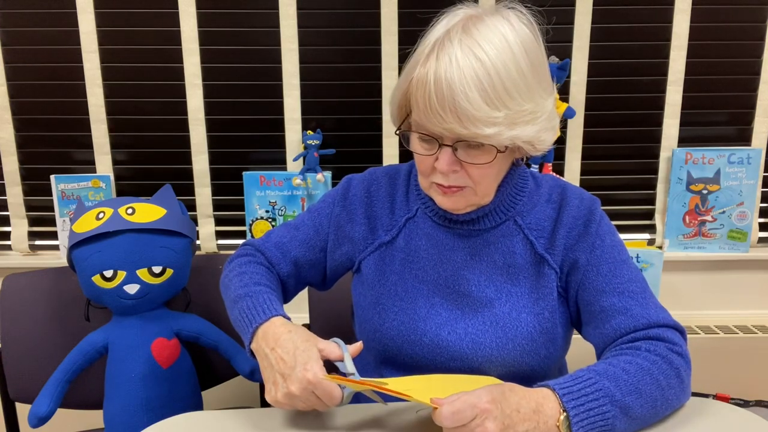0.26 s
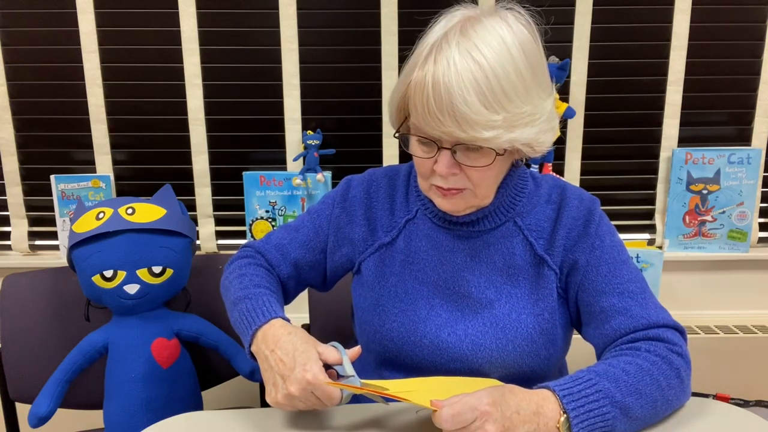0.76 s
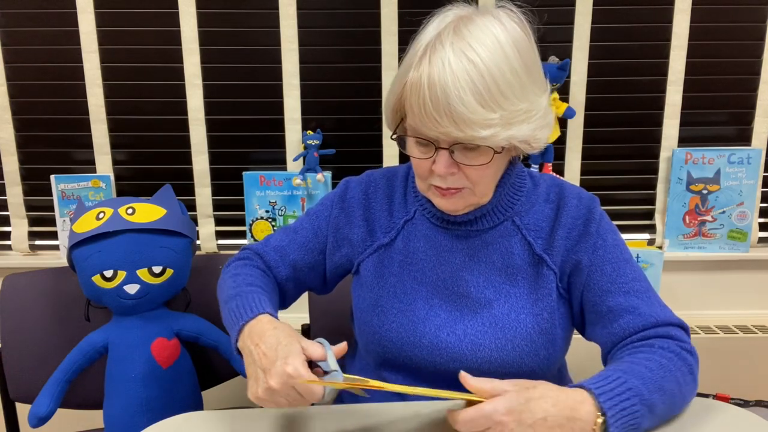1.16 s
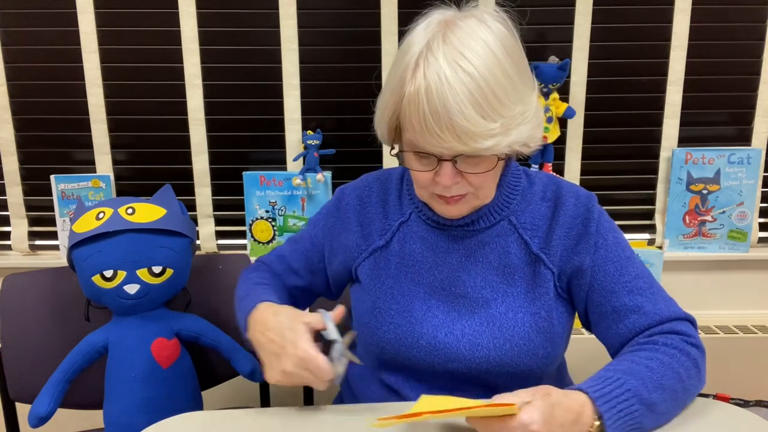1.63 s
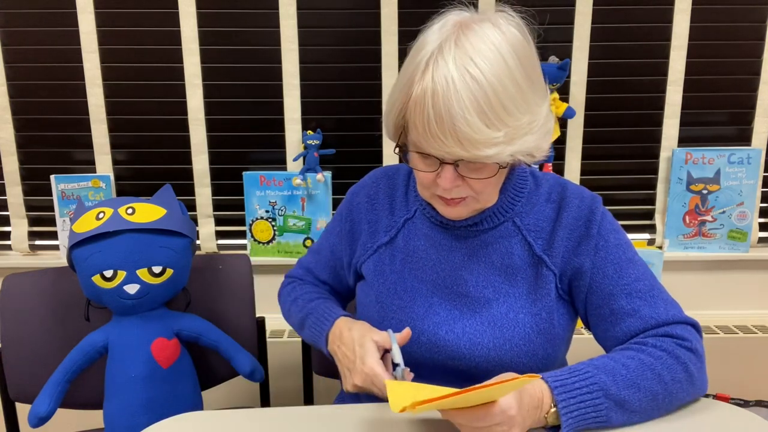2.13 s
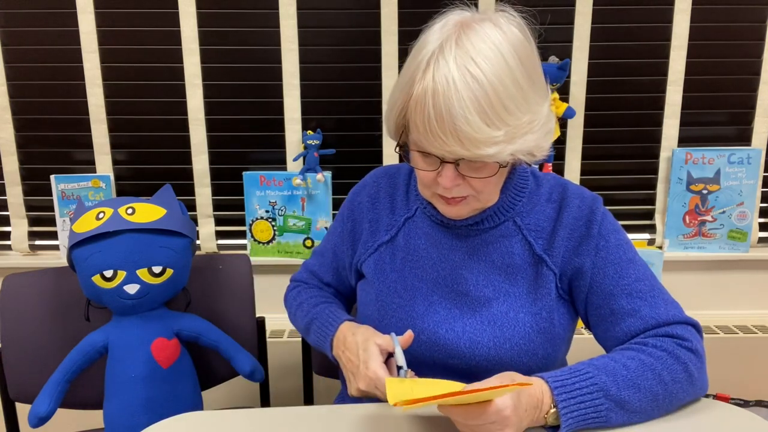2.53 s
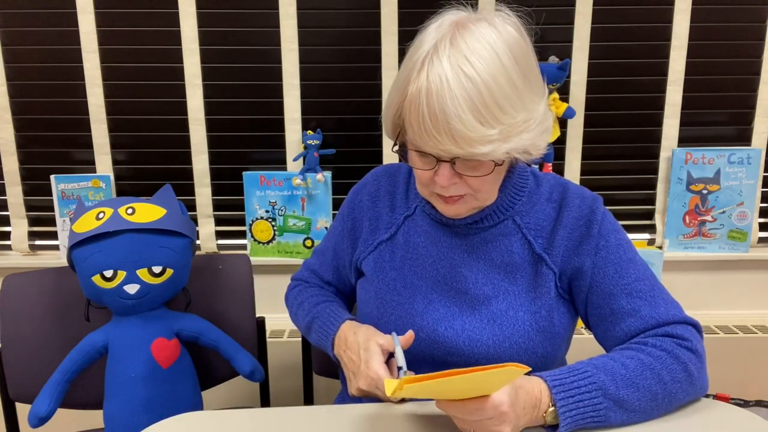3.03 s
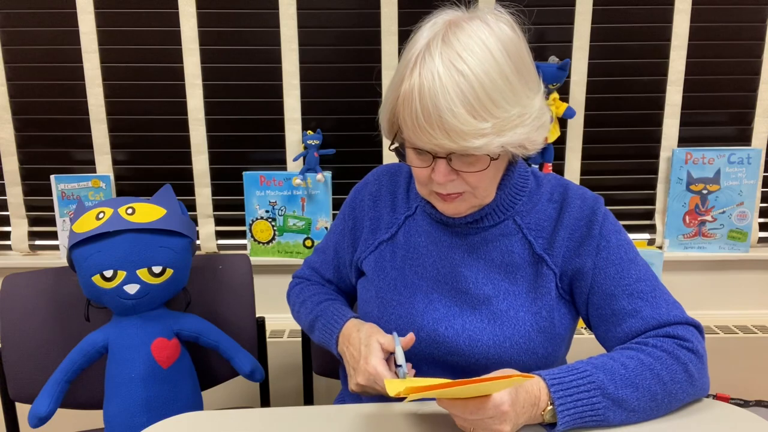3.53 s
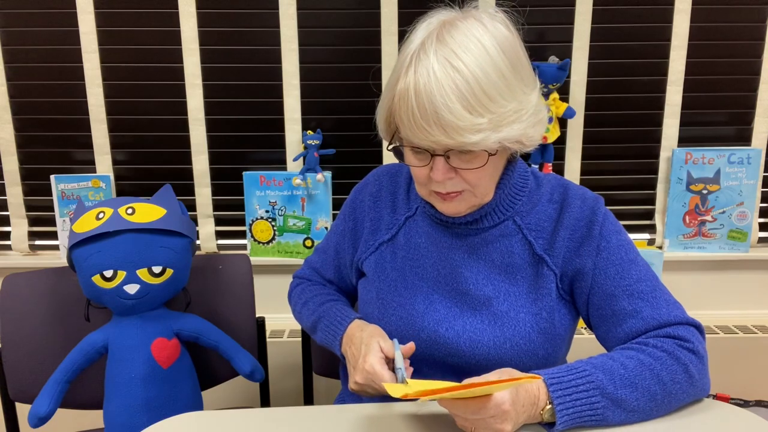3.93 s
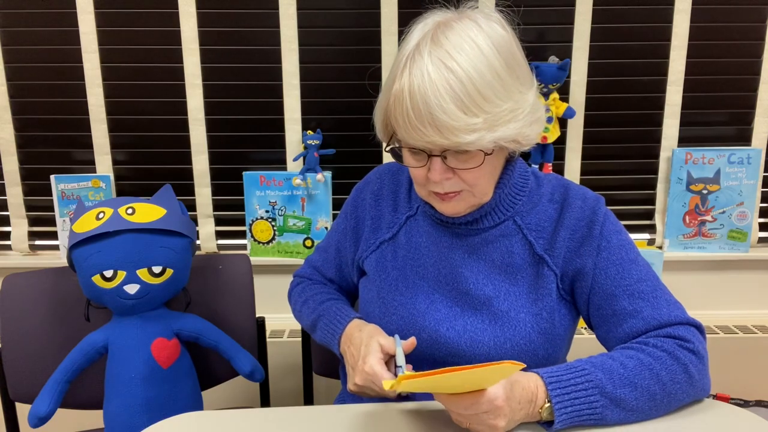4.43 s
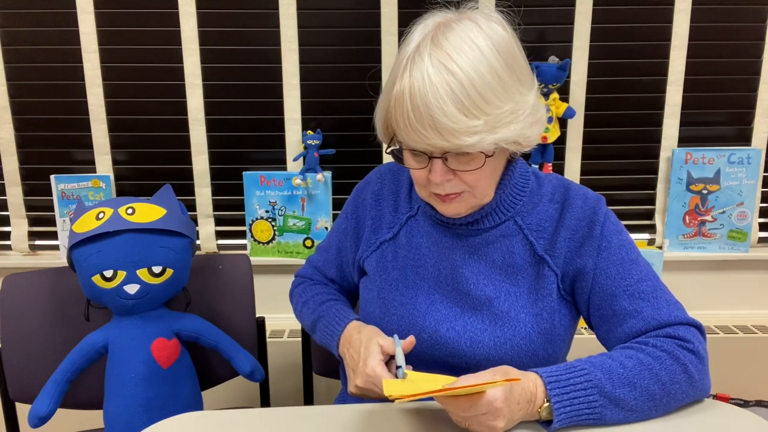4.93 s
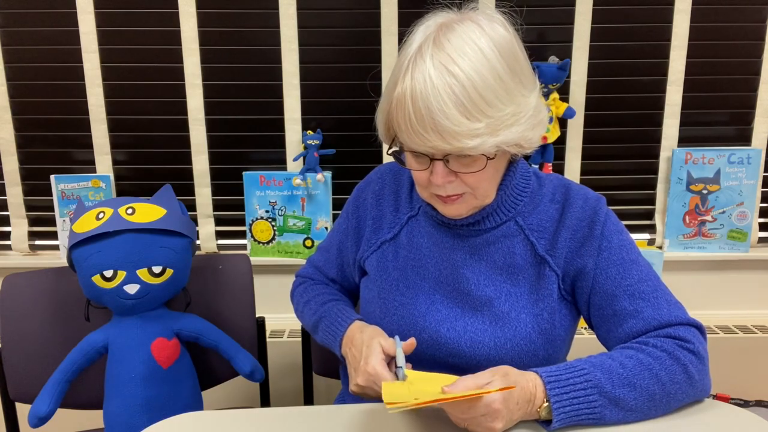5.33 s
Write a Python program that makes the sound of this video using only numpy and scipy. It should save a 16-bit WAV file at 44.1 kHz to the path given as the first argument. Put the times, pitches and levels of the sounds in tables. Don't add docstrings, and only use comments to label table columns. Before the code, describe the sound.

Close, dry sounds of scissors and stiff card above a table, picked up by a stereo phone at about a metre. One hard snip, soft rustles and rasping cuts, small creaks, then crisp clicks around four seconds and the strongest tearing snaps near the end. Steady low air noise continues throughout.

```python
import sys
import numpy as np
from scipy import signal
from scipy.fft import rfft, irfft
from scipy.io import wavfile
from scipy.ndimage import uniform_filter1d

SR = 44100
rng = np.random.default_rng(int(sys.argv[2]) if len(sys.argv) > 2 else 0)


def pcm_store(signal):
    levels = np.round(np.clip(np.atleast_2d(signal), -1, 1) * 32767)
    wavfile.write(sys.argv[1], SR, levels.astype(np.int16).T)


def voltage_ratio(level):
    return 10 ** (np.asarray(level, float) / 20)


N = 246519
TIME_S = np.arange(N) / SR
HZ = np.fft.rfftfreq(N, 1 / SR)
STEPS_S = np.arange(0, N / SR + .001, .0005)
TOP_HZ = 16740

# frequency [Hz], density [dB per Hz].
AIR_SPECTRUM = [(30, -14), (50, -19.5), (65, -6), (95, -1), (120, -1), (180, -5.5), (270, -12.5),
                (600, -24), (1100, -30), (2000, -42.5), (3500, -54.5), (6500, -57.5), (10000, -57.5),
                (14500, -74), (16500, -84)]
AIR_DB = -49
# frequency [Hz], side minus mid [dB].
AIR_SIDE = [(40, -18.5), (100, -16), (250, -11.5), (600, 2), (1500, -4.5), (4000, 1.5)]
# frequency [Hz], width [Hz], level [dB].
DUCTS = [(66.03, 8.3, -55), (121, 25, -56), (172.4, 12.6, -66), (550, 68, -70.5), (446, 40, -75),
         (636.7, 64, -73.5), (1000, 90, -78.5)]
# share of the gusts it follows, and its own wander in dB.
DUCT_FOLLOW = [1.26, .5, 0.43, 0.24, .2, .2, 0.17]
DUCT_WANDER_DB = [0, 0.64, 3.5, 1.44, 1.1, 2.1, 1.3]
# time [s], level [dB].
GUSTS = [(0.0, -56.5), (0.03, -46), (0.09, -54.5), (1.01, -51), (1.09, -57), (1.17, -47), (1.42, -58),
         (1.79, -52), (3.27, -54.5), (3.38, -48), (3.64, -50.5), (3.71, -58.5), (3.98, -52.5),
         (4.06, -65.5), (4.09, -54.5), (4.78, -57), (5.42, -47.5), (5.59, -56)]

ROOM_T60_S, ROOM_DB, WALL_MS = 0.23, -9.5, 8.5
TABLE_MS, TABLE_GAIN, LOWERED_S = 1.33, -.45, 1.9

# frequency [Hz], density [dB per Hz].
FIBRE_SPECTRUM = [(400, 1), (800, -3), (1300, -8), (2000, 6.5), (3000, 1.5), (4000, -9.5), (5200, -4),
                  (6500, -1.5), (8000, -8), (10000, -10.5), (11500, -12.5), (13000, -18), (14800, -26),
                  (16300, -33)]
# start [s], length [s], level [dB], swell over the move [dB], fibre hiss [dB].
SLIDES = [(0.977, 0.025, -85.5, 6, 4.5), (1.093, 0.071, -64.5, 1, 1.5), (1.168, .132, -65, -3, 3.5),
          (1.506, 0.067, -73.5, -10.5, 0)]
# start [s], length [s], level [dB], swell [dB], hiss [dB].
RUSTLES = [(0.019, .1, -65.5, -3, -5.5), (1.022, .07, -76, 0, -4.5), (1.565, .06, -81, 0, -6),
           (1.61, .09, -77, 2, -6.5), (1.7, .095, -72, 0, -6), (1.795, 0.019, -67, 0, -13),
           (1.82, .06, -71.5, -6.5, -6.5)]
# start [s], length [s], level [dB], swell [dB], hiss [dB].
CUTS = [(1.349, .012, -68, -3, -4), (1.375, 0.036, -63, -5.5, -1), (1.42, 0.045, -65, 1, 3.5),
        (2.003, .012, -77.5, 1, -5.5), (2.017, .034, -72, 0, -10), (2.052, .026, -71, 0, -6),
        (2.079, .012, -66.5, -1, -7), (2.09, 0.026, -69, -1.5, -5.5), (2.12, 0.054, -73.5, -1, -12),
        (2.179, .02, -66.5, -0.5, -18), (2.2, 0.03, -72.5, -4, -13.5), (2.23, .028, -77, 0, -9),
        (2.258, 0.085, -72.5, -3, -11), (4.409, 0.047, -68, -0.5, -12)]
# start [s], length [s], level [dB], swell [dB], hiss [dB].
STROKES = [(4.264, 0.086, -62, 4.5, -4), (4.343, .064, -56.5, -11, -5.5), (4.895, 0.052, -88, 2, -1),
           (4.946, .11, -75, 1, -8)]
# start [s], length [s], level [dB], swell [dB], hiss [dB].
TEARS = [(5.413, 0.014, -60, -4, -9), (5.469, 0.0076, -47.5, -1.5, -9.5), (5.574, 0.015, -59, 13.5, -9)]
# start [s], length [s], level [dB], swell [dB], hiss [dB].
CREASES = [(2.462, 0.012, -71.5, -2.5, -13), (2.525, .008, -74.5, -2, -11), (2.619, 0.02, -69, -5.5, -4),
           (2.784, 0.058, -79.5, -4, -16), (3.29, 0.11, -87, 8, -12), (3.442, 0.026, -75.5, 1, -9),
           (3.516, 0.012, -69, -2, -6), (3.536, .045, -78, 0, -7), (3.583, .012, -68, -2, -6),
           (3.596, 0.024, -73, -3, -7), (3.637, .017, -59.5, -1.5, -4), (3.65, .04, -65, -22, -8),
           (4.239, .016, -73, -5, -5), (5.238, 0.0088, -72, -4, -7), (5.309, 0.081, -62, -15, -6),
           (5.445, 0.007, -65, -1, -15), (5.462, .034, -61, -5, -9), (5.497, 0.054, -67, -4, -7),
           (5.557, 0.014, -61, -0.5, -17), (3.805, .01, -80.5, -2.5, -16), (3.92, 0.016, -79.5, 10, -10)]
# low rasp [dB], blade scrape [dB], attack [dB per ms],
# release [dB per ms], paper edge [dB].
KINDS = [
    (-2, -4.5, 4, 0.6, -2.5),
    (2, -10.5, 1.1, 0.5, 1.5),
    (4, -4, 0.8, 1.5, 1.5),
    (-2.5, -3.5, 2.5, 2, -6),
    (-4, -10, 2, 1.7, -0.5),
    (3.5, -9.5, 3, 2.5, -6),
]
# layer, weight of its level, four band edges in Hz, trim in dB.
FIBRE_BANDS = [
    ("rasp", 1, [300, 590, 1220, 1810], 0.5),
    ("body", 1, [1300, 1430, 3130, 3600], -1.1),
    ("scrape", 1, [3100, 3750, 4350, 4800], 0.2),
    ("scrape", 1.5, [3740, 3900, 3920, 4040], -9),
    ("edge", 1, [4200, 4740, 6100, 7000], -1),
    ("hiss", 1.08, [6340, 7400, 11700, 12300], 1.5),
    ("hiss", 1.7, [11180, 12600, 15000, 16000], -5)]

# start [s], length [s], level [dB], from [Hz], to [Hz].
HUMS = [(.728, 0.02, -74, 2000, 2000), (1.375, 0.026, -60, 3900, 3600), (1.39, 0.031, -66, 2900, 2900),
        (1.42, 0.025, -60, 904, 1300), (1.428, 0.039, -67, 5100, 5300), (1.445, .025, -64, 2900, 2900),
        (1.453, .018, -59, 1610, 2120), (2.017, .035, -64, 3400, 3100), (2.053, .05, -64.5, 1102, 1300),
        (2.05, 0.06, -68.5, 2190, 2300), (2.179, 0.018, -65, 1156, 1100), (2.18, 0.044, -72, 2000, 2400),
        (2.26, .04, -76, 2100, 2100), (2.612, 0.028, -71, 1700, 2000), (4.074, .008, -62, 1900, 1900),
        (4.263, .022, -62.5, 3900, 3900), (4.29, 0.083, -68.5, 4700, 4650), (4.32, 0.067, -67, 1050, 1045),
        (5.305, 0.056, -68, 1500, 2120), (5.412, .008, -59, 1090, 1200), (5.464, .013, -50, 1042, 1030),
        (5.469, .008, -56, 5800, 6800), (5.559, 0.011, -62, 3300, 3310), (5.578, .013, -50, 2000, 2800),
        (1.42, .03, -64, 3900, 4100), (1.422, .026, -65, 2200, 2600), (1.436, .014, -64, 4800, 4800),
        (3.636, .016, -58, 2000, 950), (4.262, .1, -67, 2700, 2800), (1.25, .09, -72, 2300, 2600),
        (.73, .018, -70, 1500, 1500), (4.29, .06, -68, 4050, 3950), (4.3, .06, -65, 1900, 1850),
        (4.4, .06, -75, 3900, 3800), (1.21, .09, -69, 3800, 3700), (2.005, .04, -70, 4000, 3900),
        (2.18, .16, -80, 3700, 3900), (1.62, .2, -80, 3000, 3300), (2.003, .045, -77, 5300, 5200),
        (2.177, .04, -82, 5900, 5800), (5.412, .016, -62, 2500, 2700), (5.574, .016, -57, 2900, 3100)]
HUM_WIDTH_HZ, HUM_ATTACK, HUM_RELEASE = 300, 4.8, 2.6

# time [s], peak [dB],
# frequency [Hz], ring time [ms].
PINGS = [(0.192, -55, 900, 9.6), (1.0069, -46.5, 1060, 7.6), (1.0064, -47, 4800, 8), (1.327, -46, 600, 20),
         (1.32, -52, 1100, 10), (1.344, -46, 594, 12), (1.934, -54, 1000, 7), (2.464, -55, 1100, 8),
         (2.943, -66, 900, 7.2), (3.107, -58, 900, 8), (3.437, -54, 1000, 9.4), (3.9448, -36, 4050, 6),
         (3.9442, -45, 8900, 4), (3.9445, -43, 15000, 3), (4.068, -39, 4460, 4), (4.085, -50, 2400, 5),
         (4.068, -52, 3300, 5), (4.068, -40, 7460, 4.4), (4.1302, -35, 4170, 5.2),
         (4.1302, -38.5, 9800, 3.4), (4.1301, -40, 2690, 6.5), (4.131, -43.5, 1090, 5.2),
         (4.1302, -48, 7600, 4), (4.2385, -52, 1200, 8), (4.433, -40.5, 2200, 5.6), (4.433, -42, 604, 9.9),
         (4.432, -47, 7000, 4.3), (4.433, -47, 5740, 5.1), (4.449, -43, 2000, 5.5), (4.449, -39, 704, 9),
         (5.046, -54, 3380, 7.3), (5.3012, -37.5, 1110, 5.5), (5.3012, -40, 3900, 4.6),
         (5.3014, -48, 1550, 4.9), (5.3013, -42, 13500, 3), (5.3008, -40, 2520, 5.3),
         (5.46, -32, 1800, 5.8), (5.46, -36, 890, 8), (5.46, -39, 6940, 4.6), (5.4604, -44, 5760, 3.7),
         (5.465, -38, 550, 8), (5.471, -38, 4670, 6), (5.482, -44, 300, 23), (5.5, -42, 2260, 8.7),
         (5.5, -48, 900, 8), (5.561, -44, 980, 8), (5.561, -48, 2100, 10), (3.648, -52, 9000, 4),
         (3.6535, -54, 9000, 4),
         (0.588, -30.5, 2000, 8), (0.5883, -36, 2850, 5), (0.5886, -36, 1000, 6), (0.5893, -37, 660, 14),
           (0.5886, -39, 4530, 6), (0.5892, -44, 5310, 4), (0.5892, -42, 3560, 4), (0.596, -44, 650, 25),
           (0.7269, -45, 4550, 6), (0.7267, -45, 1990, 9), (0.7268, -46, 2700, 5), (0.7265, -54, 3500, 4),
           (1.0918, -54, 4310, 5), (1.265, -52, 4700, 8), (1.321, -56, 9000, 4), (1.345, -54, 10000, 4),
           (1.4305, -46, 1760, 7), (1.7948, -53, 1560, 10), (2.0173, -54, 3760, 7), (2.0307, -50, 3390, 8),
           (2.1795, -47, 1070, 10), (2.2597, -57, 1100, 9), (2.3281, -58, 1070, 9), (2.34, -60, 3000, 6),
           (3.5207, -58, 3400, 6), (3.64, -48, 2100, 7), (3.647, -46, 1050, 9), (4.2628, -49, 1790, 7),
           (4.2783, -46, 3870, 10), (4.308, -48, 2100, 7), (4.346, -47, 3200, 5), (4.352, -48, 1800, 8)]

# time [s], peak [dB], ringing [Hz].
CRACKLES = [(0.178, -60, 2000), (0.2274, -58, 1620), (1.0233, -63, 2530), (1.2654, -54, 3680),
            (1.3224, -64, 2070), (1.796, -60, 2330), (1.9334, -64, 1810), (2.0018, -52, 3600),
            (2.4613, -54, 1740), (2.6186, -46, 2030), (2.941, -68, 1800), (3.107, -69, 1800),
            (3.443, -59.5, 1700), (3.5156, -59, 2430), (3.583, -47, 2160), (4.239, -62, 1810),
            (5.238, -50, 1700), (5.445, -50, 1680), (5.4992, -57, 2300)]
CRACKLE_THUD_DB, CRACKLE_TICK_DB = 4, -14
# time [s], peak [dB], ringing [Hz], thud [dB], tick [dB].
SNAPS = [(0.03, -39, 1760, 0, -22), (0.5878, -21, 2900, -3, -13.5), (0.589, -27.5, 2800, -18, -16.5),
         (0.7262, -41, 2900, -22, -4.5), (1.0066, -56, 4570, 4, 2), (1.326, -56, 1800, 14, -25),
         (1.3523, -38, 3940, 3, -17), (1.375, -38, 3760, -8, -13), (2.1799, -56, 3200, -9, -31),
         (3.6844, -45, 1950, -13, -16), (3.9441, -28, 3900, -8, -17), (3.9448, -35, 2000, -13, -16),
         (4.0676, -28.5, 1920, -28, -8), (4.1298, -29, 4130, -20, -4), (4.4331, -41, 2100, -14, -17),
         (4.4488, -53, 1940, -12, -29), (5.0454, -49.5, 1670, 14, -5), (5.3002, -27.5, 3600, -4, -6.5),
         (5.3011, -29, 3700, 0.5, -15), (5.4136, -44, 2280, -4, -15), (5.4597, -21, 1850, -7, -16.5),
         (5.4652, -31, 1940, 8.5, -22), (5.4712, -33, 2790, -10, -6), (5.5605, -39, 1870, -17, -28)]
# frequency [Hz], density [dB per Hz].
SNAP_SPECTRUM = [(400, -26.5), (800, 9.5), (1300, -9.5), (2000, -7.5), (3000, -7), (4000, -11.5),
                 (5200, -8.5), (6500, -5), (8000, -12), (10000, -16.5), (11500, -16.5), (13000, -21),
                 (14800, -27), (16300, -38)]
FAINT_DB, FAINT_MS, SHORTER_MS_PER_DB = -60, 2.45, 0.02
AGAIN_MS, AGAIN_SHARE = 0.687, 0.27

# frequency [Hz], left leads by [radians].
PORT_PHASE = [(0, 0), (2000, .6), (3800, .8), (5000, 1.7), (6000, 2.4), (7200, 3.3), (8900, 5.95),
              (10400, 6.5), (11900, 9.15), (13200, 10), (14800, 12.3), (16800, 12.9)]
# frequency [Hz], left minus right [dB], diffuse difference kept [dB].
PORT_GAIN = [(98.4, -0.5, 6), (404, 0.5, 1), (2000, 1.7, 0.5), (4300, 2, -3.5), (7340, 3.5, -6.5),
             (9000, -0.5, -8), (10500, 0.5, -6), (12900, 1.5, -5.5), (16000, -2, -2)]


def curve(table, column=1):
    t = np.array(table)
    return np.interp(np.log(HZ + 1), np.log(t[:, 0] + 1), t[:, column])


def colour(x, table):
    cepstrum = irfft(curve(table) * np.log(10) / 20, N)
    cepstrum[1:N // 2] *= 2
    cepstrum[N // 2 + 1:] = 0
    return irfft(rfft(x) * np.exp(rfft(cepstrum)), N)


def band(x, lo_hz, hi_hz):
    return signal.sosfilt(signal.butter(2, [lo_hz, hi_hz], "bandpass", fs=SR, output="sos"), x)


def unit(x):
    return x / np.sqrt(np.mean(x ** 2))


def walk(rate):
    k = int(SR / rate)
    held = np.repeat(rng.standard_normal(N // k + 1), k)
    return 1.94 * uniform_filter1d(uniform_filter1d(held, k), k)[:N]


def ventilation():
    mid, side = colour(rng.standard_normal((2, N)), AIR_SPECTRUM)
    scale = voltage_ratio(AIR_DB - 2.5) / np.sqrt(np.mean(mid ** 2))
    mid, side = scale * mid, scale * colour(side, AIR_SIDE)
    s, db = np.transpose(GUSTS)
    gust = np.interp(TIME_S, s, db - db.mean())
    for (hz, width_hz, db), follow, wander_db in zip(DUCTS, DUCT_FOLLOW, DUCT_WANDER_DB):
        ring = unit(band(rng.standard_normal(N), hz - width_hz / 2, hz + width_hz / 2))
        mid = mid + ring * voltage_ratio(db + follow * gust + wander_db * walk(1.982))
    rumble_cut = signal.butter(2, 40, "highpass", fs=SR, output="sos")
    return signal.sosfilt(rumble_cut, [mid + side, mid - side])


def room(x):
    t = np.arange(int(.4 * SR)) / SR
    echoes = rng.standard_normal((2, len(t))) * voltage_ratio(4.0 * rng.standard_normal((2, len(t))))
    echoes *= np.clip((t * 1000 / WALL_MS) ** 4.0, .3, 1)
    echoes *= voltage_ratio(-60 * t / ROOM_T60_S) * (1 + 2.0 * np.exp(-t / 0.0091))
    echoes = signal.lfilter([.75], [1, -.25], echoes)
    echoes /= np.sqrt(np.sum(echoes ** 2) / 2)
    return voltage_ratio(ROOM_DB) * signal.fftconvolve(x[None], echoes, axes=1)[:, :N]


def table_bounce(card):
    lowered = TIME_S > LOWERED_S
    delay_ms = TABLE_MS + np.array([[.03], [-.03]])
    bounce = TABLE_GAIN * np.exp(-2j * np.pi * HZ * delay_ms / 1000) / (1 + HZ / 9000)
    return irfft(rfft(card * lowered) * bounce, N) * lowered


def move_db(start, length, db, swell_db, attack, release):
    t = STEPS_S - start
    hold = db + swell_db * np.clip(t / max(length, .002), 0, 1)
    return hold - 1000 * (attack * np.maximum(-t, 0) + release * np.maximum(t - length, 0))


def fibre_grains():
    return rng.standard_normal(N) * voltage_ratio(3.9 * np.minimum(rng.exponential(size=N), 5))


def rubs(grains):
    moves = []
    tables = [SLIDES, RUSTLES, CUTS, STROKES, TEARS, CREASES]
    for table, (rasp_db, scrape_db, attack, release, edge_db) in zip(tables, KINDS):
        for start, length, db, swell_db, hiss_db in table:
            level = voltage_ratio(move_db(start, length, db, swell_db, attack, release))
            share_db = dict(rasp=rasp_db, body=0, scrape=scrape_db, hiss=hiss_db, edge=1.4 * hiss_db + edge_db)
            moves.append((level, share_db))
    out, fibres = np.zeros(N), rfft(colour(grains, FIBRE_SPECTRUM))
    common = walk(45)
    for layer, weight, edges_hz, trim_db in FIBRE_BANDS:
        gain = np.max([level * voltage_ratio(weight * share_db[layer]) for level, share_db in moves], axis=0)
        gain = uniform_filter1d(np.interp(TIME_S, STEPS_S, gain), size=90)
        patch_db = .6 * common + 1.3 * walk(70)
        part = unit(irfft(fibres * np.interp(HZ, edges_hz, [0, 1, 1, 0]), N))
        out += part * gain * voltage_ratio(trim_db + patch_db)
    return out


def hums(grains):
    out = np.zeros(N)
    slow = unit(irfft(rfft(grains) / (1 + (HZ / HUM_WIDTH_HZ) ** 2), N))
    for k, (start, length, db, from_hz, to_hz) in enumerate(HUMS):
        near = slice(int((start - .02) * SR), int((start + length + .06) * SR))
        hz = np.interp(TIME_S[near], [start, start + length], [from_hz, to_hz])
        level = voltage_ratio(move_db(start, length, db, 0, HUM_ATTACK, HUM_RELEASE))
        gain = np.interp(TIME_S[near], STEPS_S, level)
        flutter = np.roll(slow, shift=7919 * k)[near]
        out[near] += np.sqrt(2) * gain * flutter * np.sin(2 * np.pi * np.cumsum(hz) / SR)
    return out


def pings():
    t, out = np.arange(2048) / SR, np.zeros(N + 2048)
    for s, db, hz, ms in PINGS:
        at = int(s * SR)
        out[at:at + 2048] -= voltage_ratio(db - 60000 * t / max(ms, 1)) * np.sin(2 * np.pi * hz * t)
    return out[:N]


def snaps():
    t = np.arange(512) / SR
    rows = [*SNAPS, *[(*row, CRACKLE_THUD_DB, CRACKLE_TICK_DB) for row in CRACKLES]]
    chance = rng.standard_normal((len(rows), 2, 512))
    thud, body, tick = np.zeros((3, N + 512))
    for (s, db, hz, thud_db, tick_db), (sign, size) in zip(rows, chance):
        ms = FAINT_MS - SHORTER_MS_PER_DB * (db - FAINT_DB)
        shape = np.clip(t / .0004, 0, 1) * np.exp(-(t * 1000 / max(ms, .3)) ** 2.5)
        breaks = shape * sign * voltage_ratio(3.0 * size)
        breaks *= np.clip(0.28 * ms, 0, 3) / np.sqrt(np.sum(breaks ** 2))
        again_ms, share = AGAIN_MS * voltage_ratio(2.93 * size[0]), AGAIN_SHARE * np.tanh(sign[0])
        first = np.sinc(t * SR - 16)
        second = np.sinc(t * SR - 16 - again_ms * SR / 1000)
        sharp = -.7 * (first + share * second)
        patch = band(sharp + breaks, .8 * hz, 1.25 * hz)
        at = slice(int(s * SR), int(s * SR) + 512)
        body[at] += voltage_ratio(db) * (sharp + .6 * breaks + .5 * patch)
        thud[at] += voltage_ratio(db + thud_db) * np.roll(shape, shift=24) / np.sum(shape)
        tick[at] += voltage_ratio(db + tick_db) * (breaks + 0.56 * sharp)
    lows = voltage_ratio(32.5) * band(thud[:N], 463, 1040)
    mids = voltage_ratio(19.0) * band(colour(body[:N], SNAP_SPECTRUM), 1310, 5800)
    highs = voltage_ratio(37.0) * band(colour(tick[:N], SNAP_SPECTRUM), 7400, TOP_HZ)
    return lows + mids + highs


def scene():
    grains = fibre_grains()
    card = rubs(grains) + hums(grains) + pings() + snaps()
    return ventilation() + room(card) + table_bounce(card) + card


def roll_off(x):
    return signal.sosfilt(signal.butter(12, 16740, fs=SR, output="sos"), x)


def record(dry):
    left, right = rfft(dry)
    mid = (left + right) / 2
    side = (left - right) / 2 * voltage_ratio(curve(PORT_GAIN, column=2))
    lead = np.interp(HZ, *np.transpose(PORT_PHASE))
    turn = voltage_ratio(curve(PORT_GAIN) / 2) * np.exp(.5j * lead)
    ports = irfft(np.array([(mid + side) * turn, (mid - side) / turn]) * (HZ < TOP_HZ), N)
    ports *= np.clip(np.arange(N) / 64, 0, 1)
    return roll_off(ports)


dry = scene()
out = record(dry)
pcm_store(out)
```